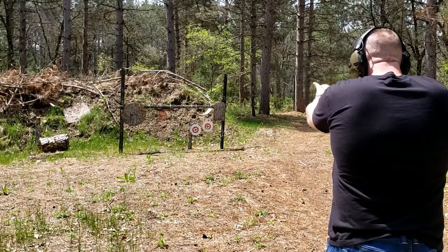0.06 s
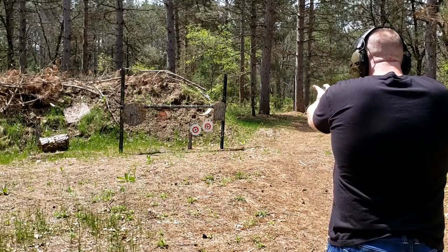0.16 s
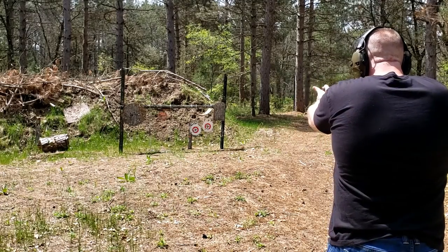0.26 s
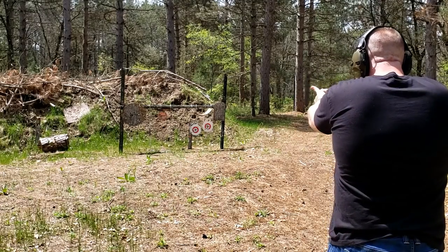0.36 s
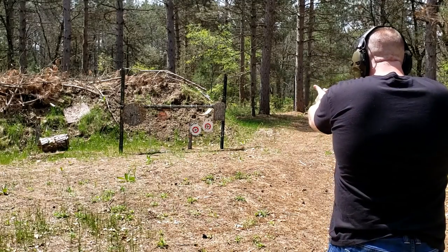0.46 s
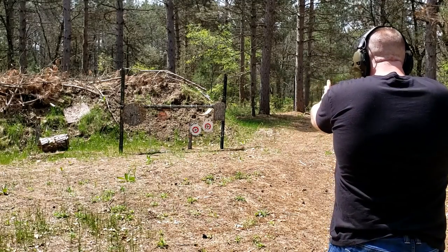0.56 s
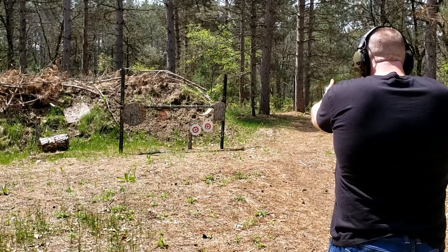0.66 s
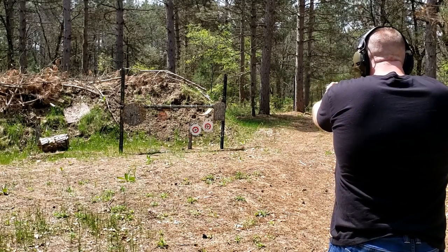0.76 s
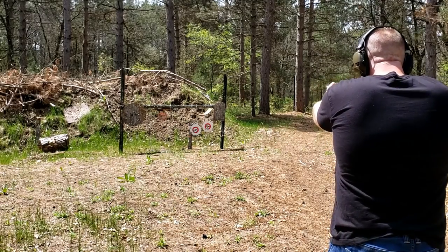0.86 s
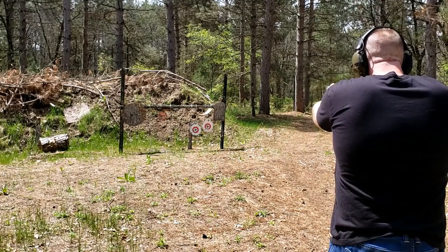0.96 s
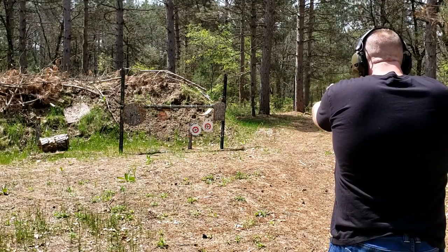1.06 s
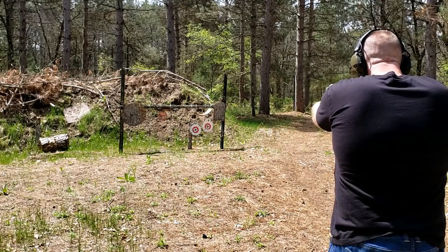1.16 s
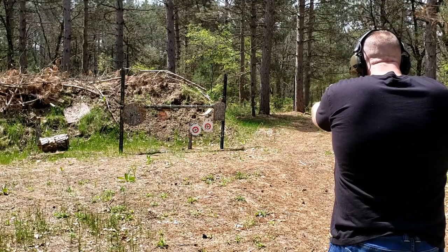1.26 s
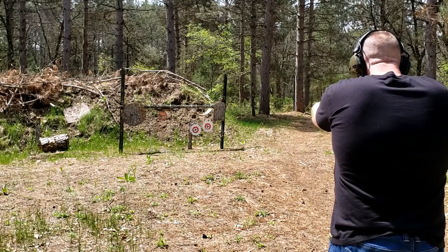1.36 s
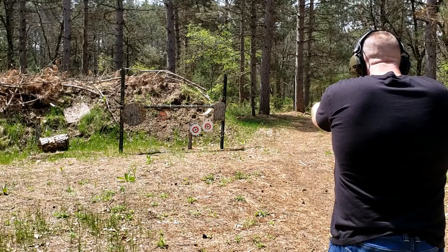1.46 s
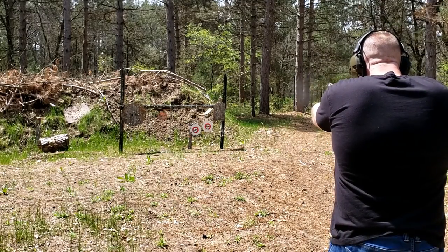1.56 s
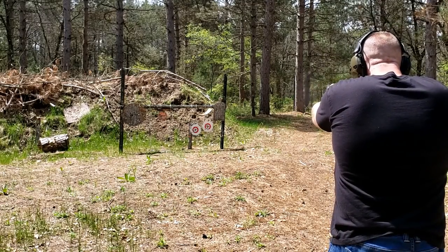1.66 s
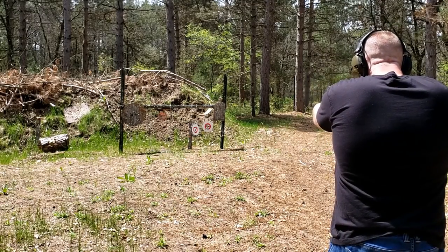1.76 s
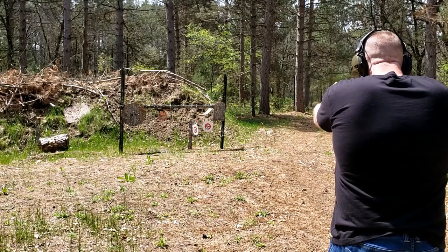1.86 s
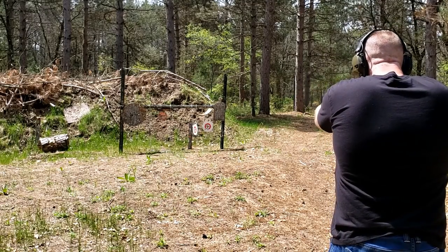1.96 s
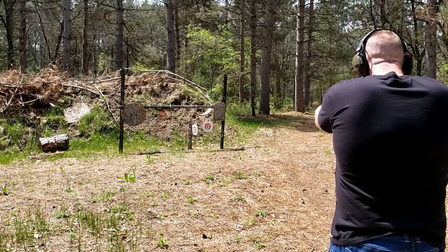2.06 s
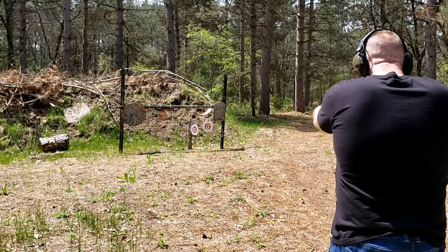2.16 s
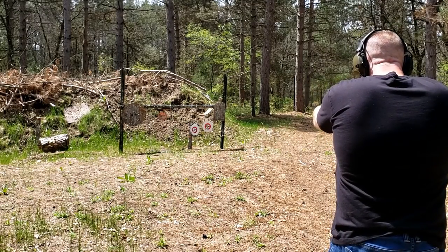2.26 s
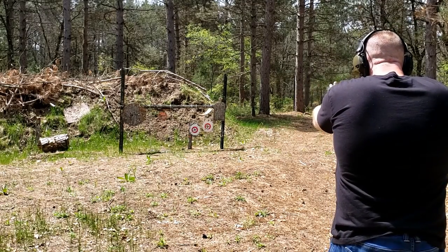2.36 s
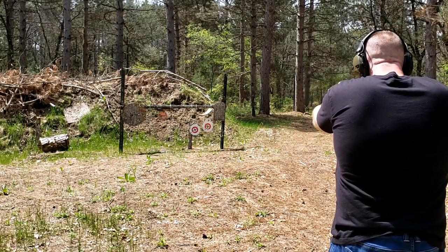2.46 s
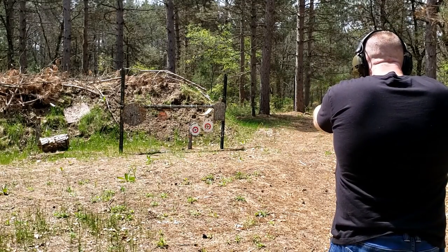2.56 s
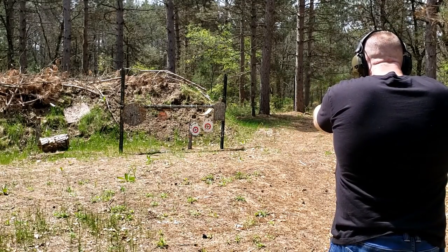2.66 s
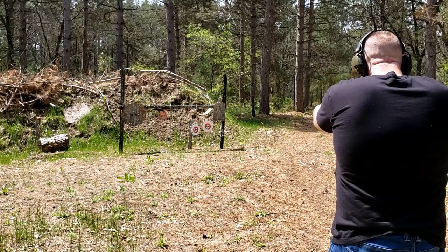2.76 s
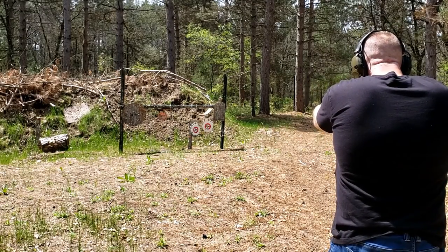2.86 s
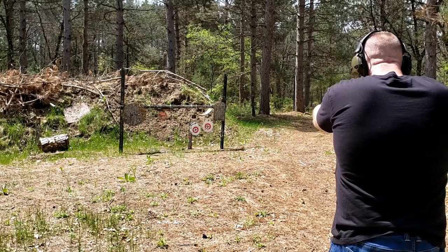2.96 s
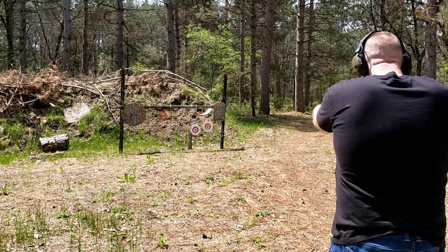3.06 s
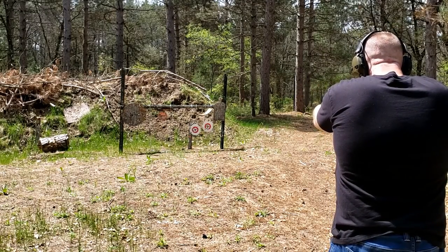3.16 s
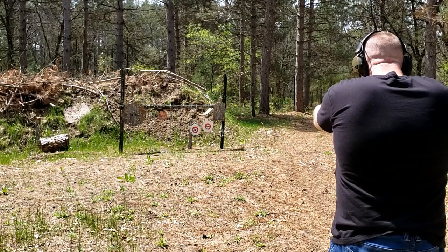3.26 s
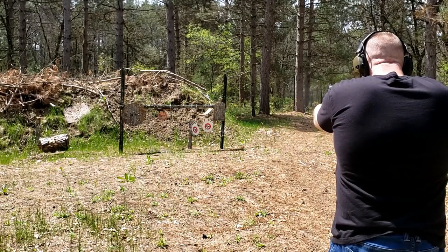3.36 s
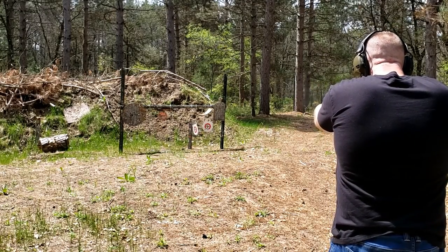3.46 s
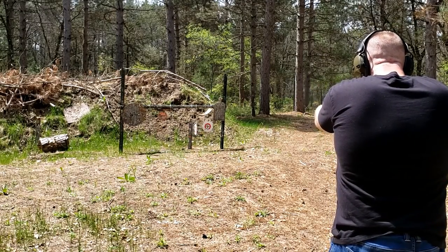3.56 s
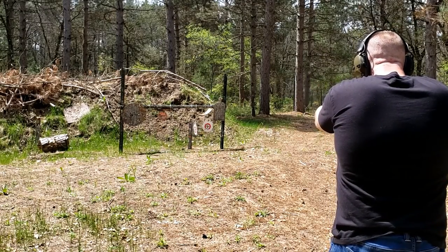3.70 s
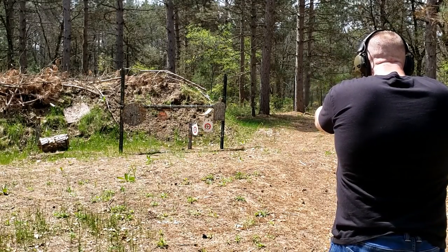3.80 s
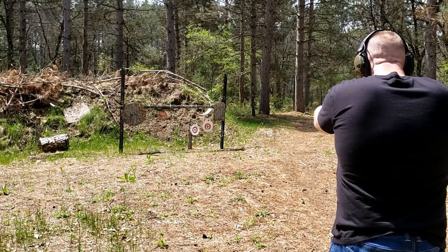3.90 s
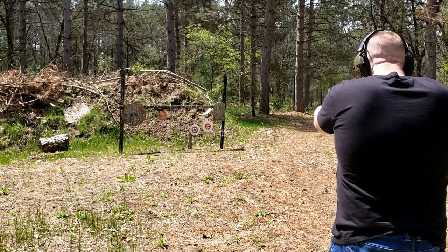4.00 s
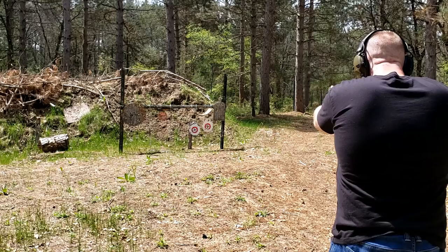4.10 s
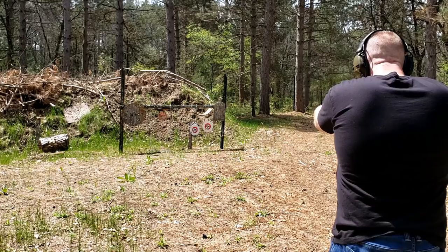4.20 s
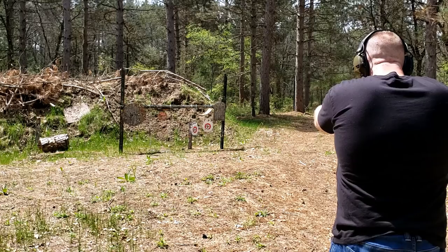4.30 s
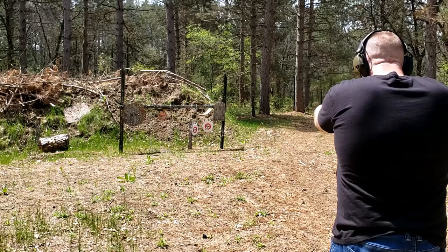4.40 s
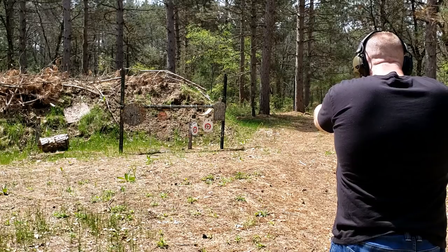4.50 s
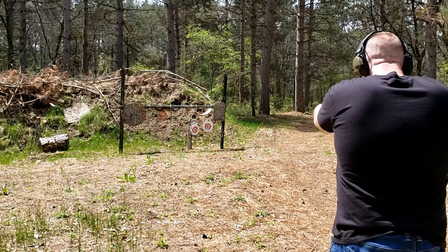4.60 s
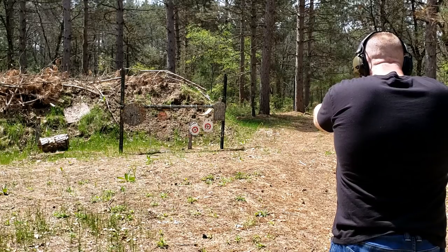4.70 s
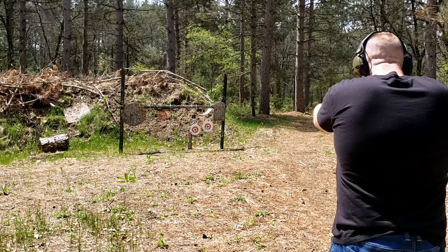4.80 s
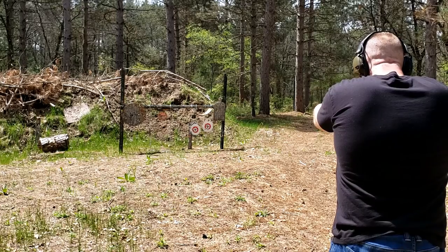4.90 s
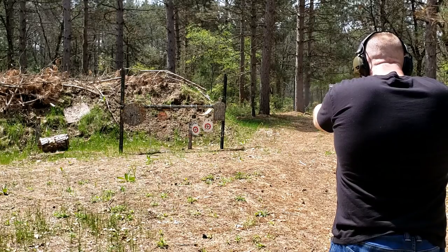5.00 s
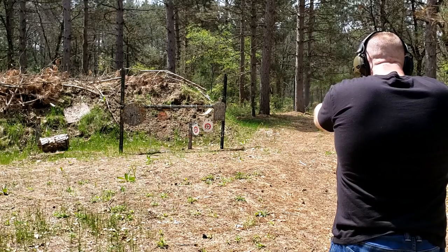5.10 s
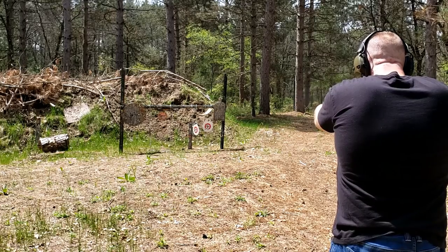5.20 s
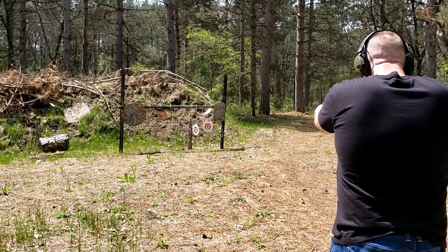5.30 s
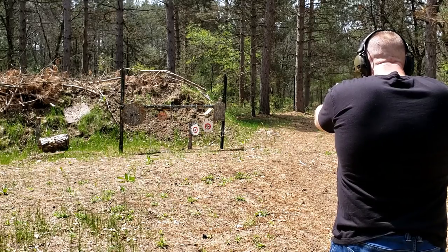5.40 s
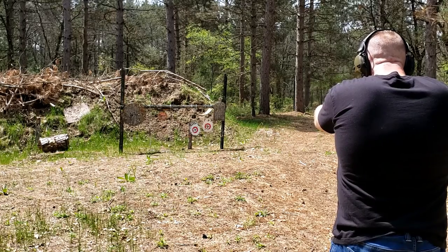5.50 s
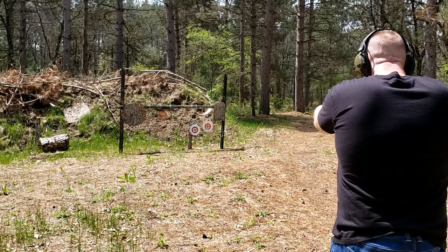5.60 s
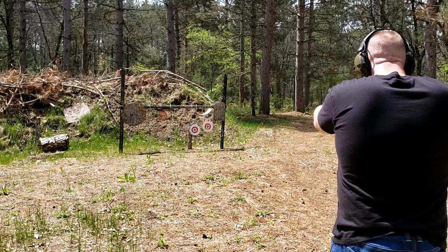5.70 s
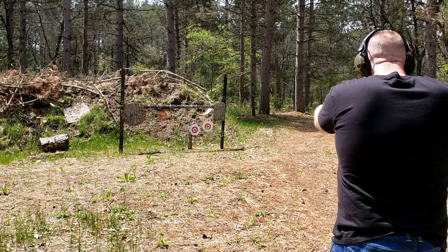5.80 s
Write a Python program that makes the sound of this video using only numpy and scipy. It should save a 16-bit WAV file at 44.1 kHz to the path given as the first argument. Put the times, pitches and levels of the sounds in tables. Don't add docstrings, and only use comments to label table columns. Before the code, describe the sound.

The stretch opens on the fading woodland reverb of an earlier gunshot, above faint low traffic rumble. Two tiny dry hammer clicks come at 0.4-0.5 s, then very faint falling bird whistles with slight upward flicks at 0.57-0.77 s. At 1.7 s a small revolver fires close by: a clipped crack with a brief low thump, quick slaps from ground and trunks, and a diffuse tail through the trees. Almost at once a steel plate rings, swelling bright, fluttering, and leaving a thin hum. Cocking clicks follow at 2.2-2.3 s. The second shot, a harder crack, hits at 3.4 s, with another metallic ring at 3.47 s and wavering residue. Clicks return around 4.05-4.14 s. The third blast at 5.1 s has a stronger earth-bank echo and no new plate strike; its tail fades under final clicks at 5.6-5.7 s. The stereo microphone is close and overloaded.

```python
import sys
import numpy as np
from scipy import signal
from scipy.fft import rfft, irfft, next_fast_len
from scipy.io import wavfile
from scipy.ndimage import uniform_filter1d

SR = 44100
rng = np.random.default_rng(int(sys.argv[2]) if len(sys.argv) > 2 else 0)


def gain_from_db(level_db):
    decades = np.asarray(level_db, float) / 20
    return 10 ** decades


def transcribe(signal):
    frames = np.atleast_2d(signal).T
    limited = np.clip(frames, -1, 1)
    pcm = np.round(limited * 32767).astype(np.int16)
    wavfile.write(sys.argv[1], SR, pcm)


N = 257984
T = np.arange(N) / SR

# start_s, crack_db, dip_db, blast_db, ground_db
SHOTS = [
    (1.6978, -17, -22, -11, -2),
    (3.4256, -14, -14, -8, -.3),
    (5.0875, -17, -3.5, -3.5, -1),
]
# level_db, pitch_hz, delay_ms
SWINGS = [
    [(-9, 47, 6.0), (-11, 52, 5.0)],
    [(-9, 45, 7.5), (-3, 72, 5.5)],
    [(-9, 47, 7.0), (-3.5, 69, 5.5)],
]
# dip_lag_ms, blast_lag_ms, ground_lag_ms, ground_width_ms, swing_decay_ms
PORTS = [(.3, .9, 4.4, .26, 14), (.2, .8, 4.05, .46, 13)]
# delay_ms, right_lead_ms, width_ms, level_db
TRUNKS = [
    (21.2, .4, .36, -6),
    (25.3, .4, .3, -15),
    (12.0, -.3, .2, -18),
    (33, .3, .3, -22),
]
# start_s, wood_db, bank_db
ANSWERS = [
    (-.12, -26.5, -71),
    (1.6979, -26.5, -41),
    (3.4272, -28.5, -40.5),
    (5.0881, -28, -28.5),
]
# pitch_hz, near_db, near_t60_s, far_db, far_t60_s
WOOD = [(221, -14, 0.41, -43.5, 0.94), (400, -6, 0.35, -30, 2.3), (650, -8, 0.95, -24.5, 3.07),
        (1000, 5.5, 0.4, -15, 2.29), (1470, 1, 0.53, -18, 2.3), (1632, -7.5, .62, -29.5, 2.67),
        (2210, -6, 0.57, -19, 1.86), (3960, -4.5, 0.45, -18.5, 1.23), (5370, -5, .49, -25, 1.3),
        (7200, -3, 0.53, -34.5, 1.3), (9200, -5.5, 0.35, -50.5, 2.1), (11300, -2, 0.51, -59, 1.7),
        (13500, 0, 0.17, -60, 1.5), (15150, -5, .28, -67.5, 1.5)]
# start_s, turned_away_db, face_on_after_s, face_on_db, swung_past_db
STRIKES = [
    (1.748, -9, .075, 6.5, -2.5),
    (3.473, -2, .03, 2, -1),
]
PLATE_HZ = [2698, 3152, 3801, 4080, 4797, 5126, 5305, 5726, 6152, 6505, 6907, 7687, 7862, 8287, 8635, 8812,
            9378, 10430, 10590, 10690, 11765, 12097, 12633, 12880, 13363, 14125, 14935]
# first_hit_db, first_t60_s, second_hit_db, second_t60_s
RING = [(-37, 0.37, -31.5, 0.61), (-36.5, 0.6, -39, 0.55), (-44.5, 0.97, -52, 0.58),
        (-43, 0.7, -33.5, 0.44), (-40.5, 0.81, -32.5, 0.38), (-42.5, 0.83, -33.5, 0.46),
        (-43, 0.43, -46.5, 0.45), (-38, 0.5, -51.5, 0.41), (-34.5, 0.56, -47, 0.35),
        (-33, 0.51, -43.5, 0.55), (-29.5, 0.62, -42, 0.6), (-35.5, 0.49, -48, 0.5), (-30, 0.38, -43, 0.54),
        (-43.5, 0.56, -47, 0.47), (-40, 0.31, -79.5, 0.79), (-41, 0.46, -77, 0.42), (-39, 0.53, -50, 0.78),
        (-40, 0.52, -51, 0.4), (-41, 0.61, -57.5, 0.48), (-52, 0.37, -39, 0.36), (-44, 0.61, -48.5, 0.42),
        (-49.5, 0.42, -46.5, 0.38), (-42, 0.37, -51, 0.38), (-55.5, 0.36, -53.5, 0.33),
        (-41, 0.32, -53.5, 0.32), (-46, 0.36, -50, 0.42), (-38, 0.35, -49.5, 0.33)]
# start_s, end_s, level_db, fade_db_per_s, left_minus_right_db
HUM_TURNS = [(1.743, 2.487, -43, 23.5, -5), (2.4, 3.455, -57.5, 11, 0), (3.847, 4.052, -67, -29, -7),
             (4.08, 4.395, -68.5, 25, -1.5), (4.384, 4.73, -74, 17.5, 0), (4.699, 5.03, -83.5, 26.5, 0.1)]
# start_s, end_s, level_db, fade_db_per_s, left_minus_right_db
WHINE_TURNS = [(2.697, 3.383, -99, 12, 0.087), (4.01, 4.154, -76, 13, 0.1), (4.15, 4.46, -92, 10, 0.1)]
# start_s, level_db, pitch_hz, left_minus_right_db
COCKS = [(0.4267, -63.5, 7100, 6), (0.4928, -63, 7400, 5), (2.2028, -69, 6600, -2),
         (2.3183, -59.5, 7400, 6), (4.0477, -62, 6890, 6), (4.1116, -70, 10300, 1), (4.1395, -72, 6980, -4),
         (5.622, -67, 7060, 2), (5.6945, -62.5, 7900, 9)]
# start_s, length_s, from_hz, to_hz, level_db
BIRD = [
    (0.568, .034, 6340, 4200, -73),
    (.62, .024, 5800, 7200, -85),
    (.695, 0.04, 6200, 4180, -76),
    (.75, 0.022, 5900, 7200, -86),
]
# pitch_hz, level_db_per_hz
RUMBLE = [(18, -39), (30, -13.5), (161, 3), (206, -10), (252, -8), (412, -25.5), (457, -13.5), (897, -12.5),
          (1660, -31), (1800, -27.5), (4000, -69), (5200, -86), (8800, -120)]
# pitch_hz, width_hz, level_db
DRONE = [(270, 80, 0), (340, 80, -3), (410, 60, 0)]
# start_s, length_s, rumble_swell_db, drone_db, drone_hz
PASSES = [(0.0, .5, 2.5, -76.5, 300), (1.199, .6, 8.5, -67, 400), (2.85, 1, 3.5, -68.5, 286),
          (3.945, .35, -3, -79, 280), (4.808, .4, 0.5, -80, 280), (5.4, .45, 0, -85.5, 270)]
# pitch_hz, level_db
MIC = [(6000, 0), (7500, 2), (8000, 0), (8400, -7), (9500, -5), (11000, 0), (15800, 0), (16100, -8),
       (16250, -40)]

PORT_GAP = 21
BANK_MS = 44.3
DUCK_DB, HELD_DB, LET_GO_S, LET_GO_WIDTH_S = -8, -3, 0.017, 0.023
HUM_HZ, WHINE_HZ = 1770, 5308
SWING_PAST_S, BEAM_SHARPNESS = .09, 0.74
CALM_DB, GUST_DB, DRONE_DB = -1, 1.5, -74.5


def band(x, hz, width):
    edges = np.clip([hz - width / 2, hz + width / 2], 5, .48 * SR)
    return signal.sosfilt(signal.butter(2, edges, "band", fs=SR, output="sos"), x)


def unit(x):
    return x / np.sqrt(np.mean(x ** 2))


def after(s):
    return np.maximum(T - s, 0), T >= s


def fall(t, t60):
    return gain_from_db(-60 * t / t60)


def bump(s, width_ms):
    return np.exp(-((T - s) * 1000 / width_ms) ** 2)


def arch(s, length, sharpness):
    return np.sin(np.pi * np.clip((T - s) / length, 0, 1)) ** sharpness * (T < s + length)


def walk(rate):
    k = int(SR / rate)
    steps = np.repeat(rng.standard_normal(N // k + 1), k)
    return unit(uniform_filter1d(uniform_filter1d(steps, k), k)[:N])


def tone(hz, turn):
    hz = hz + np.zeros(N)
    phase = 2 * np.pi * (np.cumsum(hz) / SR + rng.random())
    lag = np.pi * hz * turn * PORT_GAP / SR
    return np.array([np.sin(phase - lag), np.sin(phase + lag)])


def scatter(per_s, spread_db):
    when, turn, size = rng.random((int(per_s * N / SR), 3)).T
    lag = PORT_GAP / 2 * np.cos(2 * np.pi * turn)
    size = gain_from_db(-spread_db * np.log(size)) * np.sign(np.sin(2 * np.pi * turn))
    ports = []
    for side in (1, -1):
        place = np.clip(when * N + side * lag, 0, N - 1).astype(int)
        ports.append(np.bincount(place, size, N))
    return np.array(ports)


def slices(x, lo_hz, count, per_octave):
    size = next_fast_len(N)
    spectrum = rfft(x, size)
    hz = (np.arange(spectrum.shape[-1]) + 1e-9) * SR / size
    place = per_octave * np.log2(hz / lo_hz)
    for k in range(count):
        window = np.cos(np.pi / 2 * np.clip(place - k, -1, 1)) ** 2
        yield lo_hz * 2 ** (k / per_octave), unit(irfft(spectrum * window, size)[..., :N])


def blast():
    out = np.zeros((2, N))
    for (s, crack_db, dip_db, blast_db, ground_db), swings in zip(SHOTS, SWINGS):
        for ear, (dip, lag, ground, width, decay) in enumerate(PORTS):
            t, on = after(s)
            crack = band(rng.standard_normal(N), 3800, 4400) + .25 * rng.standard_normal(N)
            out[ear] += gain_from_db(crack_db) * on * (t < lag / 1000) * unit(crack)
            out[ear] -= gain_from_db(dip_db) * bump(s + dip / 1000, .17)

            t, on = after(s + (lag - .15) / 1000)
            recovery = 1.9 * np.exp(-t / .0015) - .5 * np.exp(-t / .006)
            out[ear] += gain_from_db(blast_db) * np.tanh(t / .00025) * recovery

            ground_s = s + ground / 1000
            rough = 1 + .16 * unit(band(rng.standard_normal(N), 5000, 7000))
            lopsided = np.where(T > ground_s, 1.5, .6)
            out[ear] -= gain_from_db(ground_db) * bump(ground_s, width * lopsided) * rough

            db, hz, start = swings[ear]
            t, on = after(s + start / 1000)
            settle = np.exp(-t * 1000 / (1.25 * decay) - (t / .029) ** 4)
            out[ear] += gain_from_db(db + 0.5) * settle * np.sin(2 * np.pi * hz * t)

            for delay, lead, wide, db in TRUNKS:
                at = s + (delay - ear * lead) / 1000
                out[ear] += gain_from_db(db) * (bump(at, .3 * wide) - bump(at + wide / 1000, .6 * wide))
    return out


def wood():
    hz, *columns = np.transpose(WOOD)
    start, wood_db, bank_db = np.transpose(ANSWERS)
    start = start + .0041
    latest = np.searchsorted(start, T) - 1
    t = T - start[latest]
    let_go = (1 + np.tanh((t - LET_GO_S) / LET_GO_WIDTH_S)) / 2
    held_db = DUCK_DB + (HELD_DB - DUCK_DB) * let_go
    late = t - BANK_MS / 1000
    bank = gain_from_db(bank_db[latest]) * (late > 0) * np.exp(-np.abs(late) / .002)
    out = np.zeros((2, N))
    for centre, echoes in slices(scatter(14000, 1.5), 157.5, count=21, per_octave=3):
        db, near, far_db, far = (np.interp(np.log(centre), np.log(hz), c) for c in columns)
        tail = gain_from_db(db) * fall(t, near) + gain_from_db(far_db) * fall(t, far)
        slow_build = 1.0 + 0.029 * np.abs(np.log2(1200 / centre))
        trees = gain_from_db(wood_db[latest] + 0.5 + slow_build * held_db) * tail
        bank_colour = min(centre / 2600, 1, (7500 / centre) ** 2)
        out += (trees + bank * bank_colour) * echoes
    return out


def plate():
    out = np.zeros((2, N))
    for hit, (s, away_db, face_s, face_db, past_db) in enumerate(STRIKES):
        t, on = after(s)
        rise_db = away_db + (face_db - away_db) * t / face_s
        swing_db = past_db + (face_db - past_db) * np.exp(-np.maximum(t - face_s, 0) / SWING_PAST_S)
        turned = np.where(t < face_s, rise_db, swing_db) + np.array([[1.], [-1.]])
        flutters = [1.7 * walk(20) for _ in range(9)]
        for k, (hz, row) in enumerate(zip(PLATE_HZ, RING)):
            db, t60 = row[2 * hit:2 * hit + 2]
            db = db + 1.2 - 3 * (hz > 10000) - np.interp(hz, *np.transpose(MIC))
            out += on * gain_from_db(db + turned + flutters[k % 9]) * fall(t, t60) * tone(hz, .06)
    for hz, turns in ((HUM_HZ, HUM_TURNS), (WHINE_HZ, WHINE_TURNS)):
        beam = np.zeros((2, N))
        for s, end, db, fade_db, pan_db in turns:
            level = db - fade_db * np.clip(T - s, 0, end - s) + pan_db * np.array([[.5], [-.5]])
            beam += arch(s, end - s, BEAM_SHARPNESS) * gain_from_db(level)
        out += 2 ** .5 * beam * tone(hz, 0.089)
    return out


def hammer():
    out = np.zeros((2, N))
    for s, db, hz, pan_db in COCKS:
        t, on = after(s)
        tick = unit(band(rng.standard_normal((2, N)), 9200, 8000)) * fall(t, 0.007)
        ring = np.sin(2 * np.pi * hz * t) * fall(t, .014)
        out += on * (1.5 * tick + 0.43 * ring) * gain_from_db(db + np.array([[pan_db], [-pan_db]]) / 2)
    return out


def bird():
    out = np.zeros((2, N))
    for s, length, from_hz, to_hz, db in BIRD:
        u = np.clip((T - s) / length, 0, 1)
        bend = 2.5 if to_hz > from_hz else 1.4
        glide = to_hz + (from_hz - to_hz) * (1 - u) ** bend
        out += gain_from_db(db) * np.sin(np.pi * u) ** .6 * tone(glide, .3)
    return out


def rumble():
    hz, db = np.transpose(RUMBLE)
    air = scatter(30000, 0.17)
    swell_db = CALM_DB + GUST_DB * walk(5.2)
    passing = np.zeros((2, N))
    for s, length, rise_db, drone_db, drone_hz in PASSES:
        swell_db = swell_db + rise_db * arch(s, length, 0.4)
        hum = unit(band(air, drone_hz, 90))
        passing += arch(s, length, 0.96) * gain_from_db(drone_db + 1.5 * walk(4)) * hum
    out = np.zeros((2, N))
    for centre, part in slices(air, 50.0, count=13, per_octave=2):
        colour = np.interp(np.log(centre), np.log(hz), db) + 10 * np.log10(centre)
        swell = swell_db * np.clip(min(1.2 - centre / 900, centre / 140), 0, 1)
        out += gain_from_db(colour - 90.5 + swell + 2.2 * walk(18)) * part
    for f, width, level_db in DRONE:
        out += gain_from_db(DRONE_DB) * gain_from_db(level_db - 5 + 1.2 * walk(6.3)) * unit(band(air, f, width))
    return out + passing


def scene():
    return blast() + wood() + plate() + hammer() + bird() + rumble()


def top_cut(x):
    return signal.sosfilt(signal.butter(12, 16300, fs=SR, output="sos"), x)


def record(dry):
    size = next_fast_len(N)
    hz = np.arange(size // 2 + 1) * SR / size
    colour = gain_from_db(np.interp(hz, *np.transpose(MIC)))
    clipped = np.clip(irfft(rfft(dry, size) * colour, size)[:, :N], -1, 1)
    hiss = gain_from_db(-94.5) * rng.standard_normal(dry.shape)
    return top_cut(clipped + hiss)


dry = scene()
out = record(dry)
transcribe(out)
```